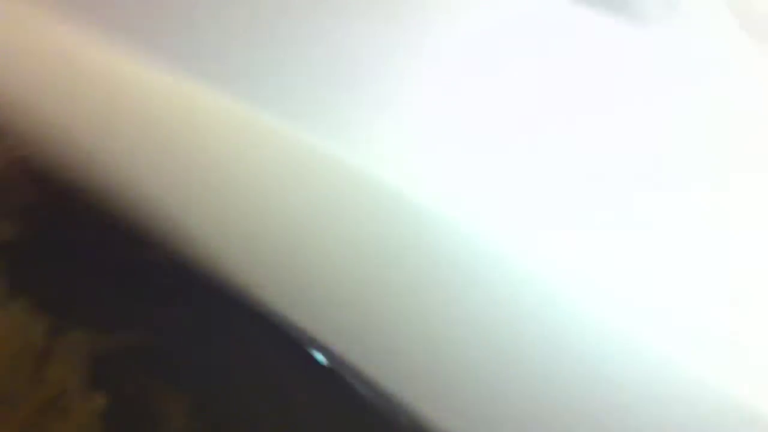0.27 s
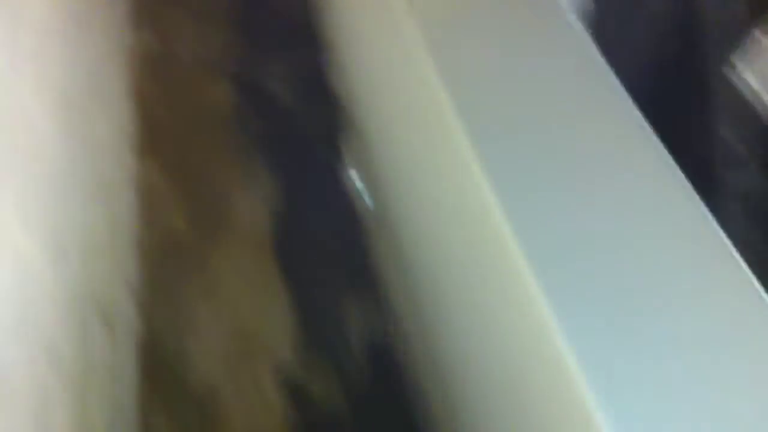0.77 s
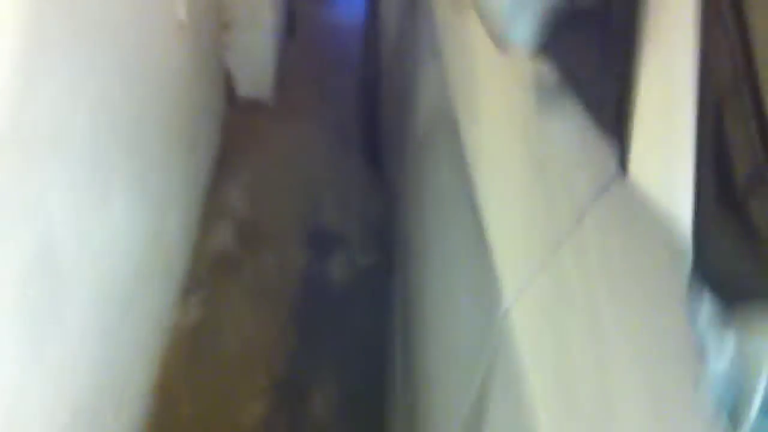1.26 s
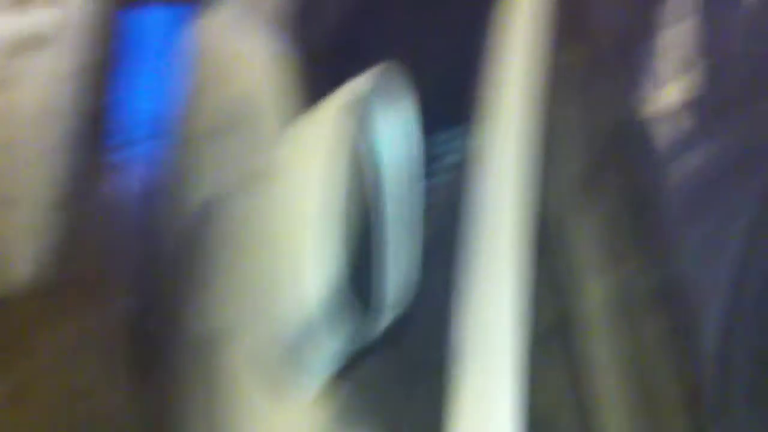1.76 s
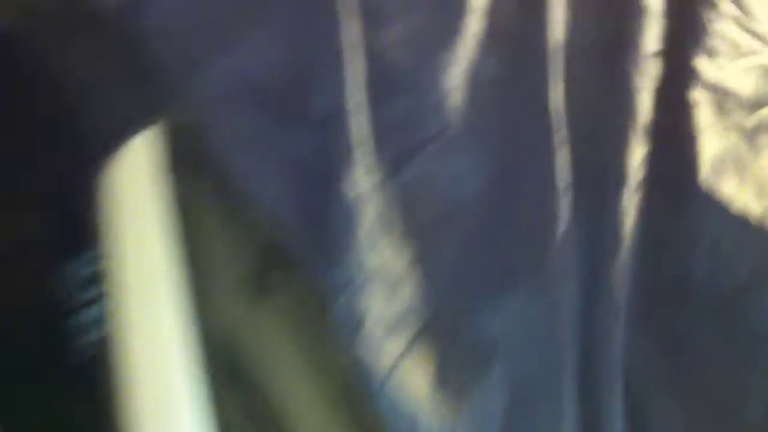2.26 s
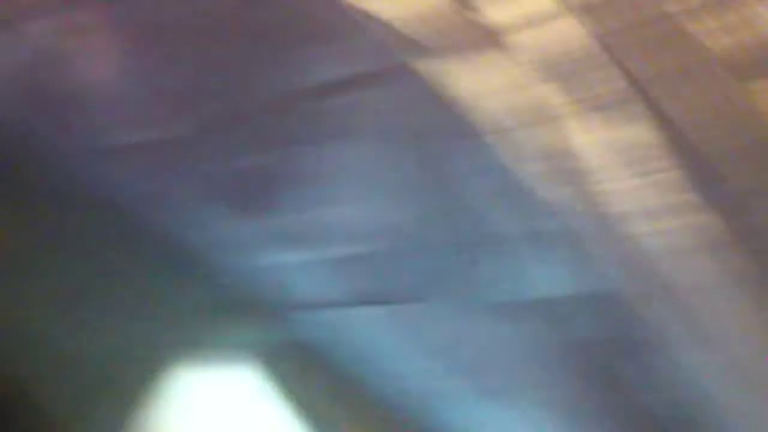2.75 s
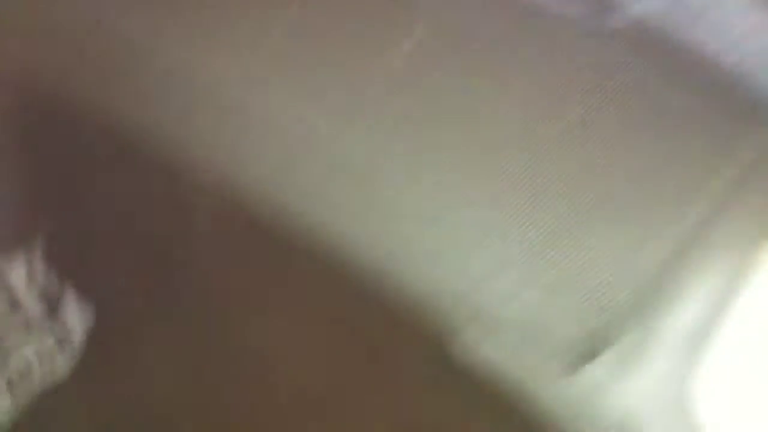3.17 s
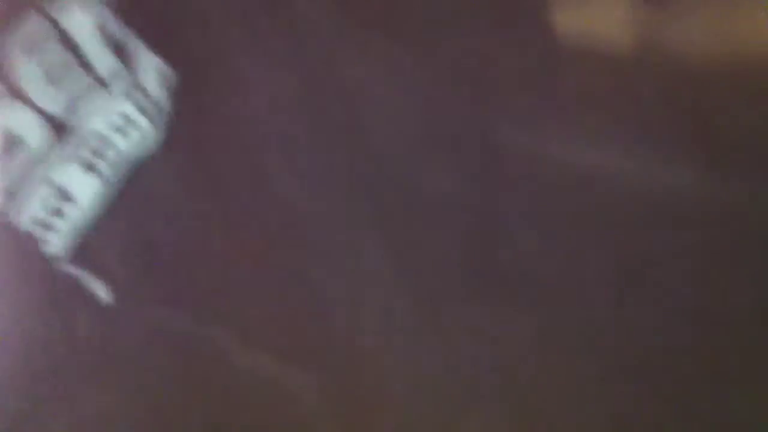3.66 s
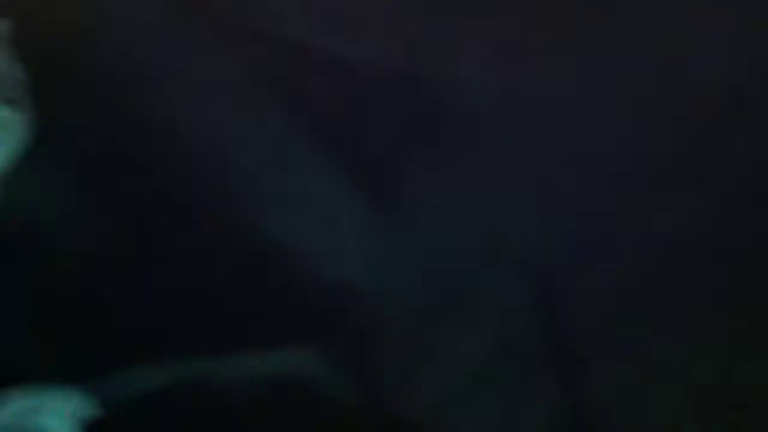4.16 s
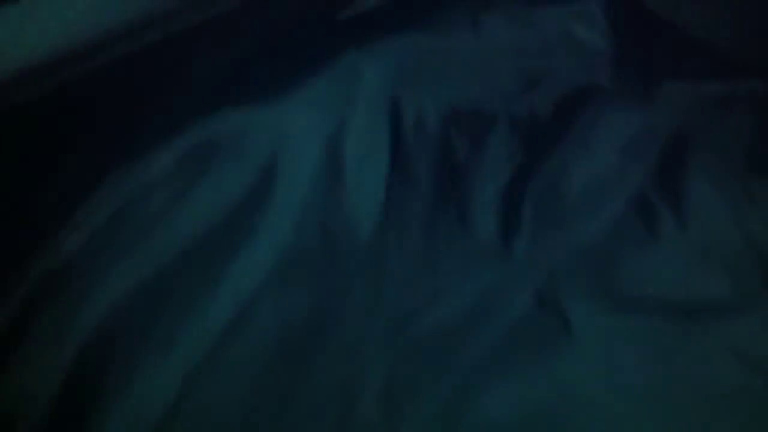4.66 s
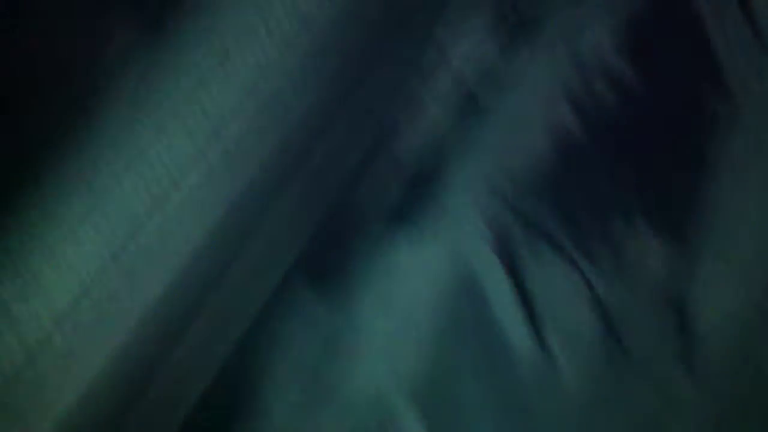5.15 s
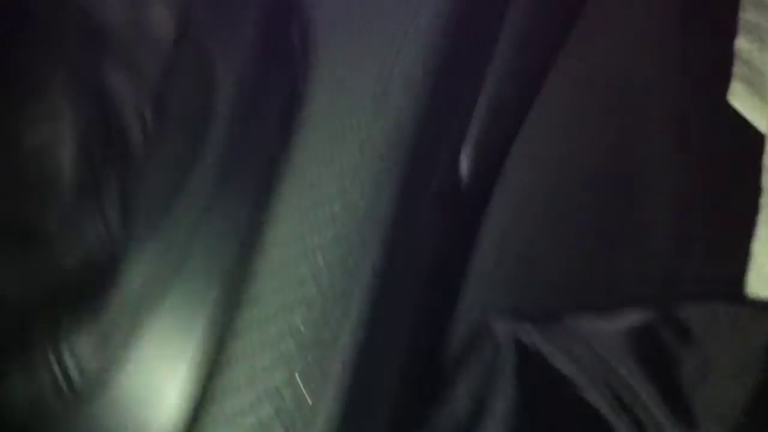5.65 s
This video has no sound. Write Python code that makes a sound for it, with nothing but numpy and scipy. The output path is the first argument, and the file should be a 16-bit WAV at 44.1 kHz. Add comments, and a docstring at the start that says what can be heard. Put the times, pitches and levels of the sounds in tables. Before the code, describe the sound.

A supercharged car engine idles with a low drone, hiss and ticking, swells briefly, then turns quieter and muffled inside the cabin.

```python
"""Hissing intake air and ringing tappets sound over the drone of a supercharged straight-six idling in a garage.
Periodic firing gives the exhaust a harmonic spectrum, whose strongest partials swell and fade as
the listener moves through the room's standing waves. Valve impacts excite resonances of the block
and its cover, and the blower's rotors hum. The listener passes from the engine bay into the cabin,
where the car's body muffles the engine; a sleeve brushes the seat at the end."""
import sys
import numpy as np
from scipy import signal
from scipy.fft import rfft, irfft, next_fast_len
from scipy.io import wavfile
from scipy.ndimage import map_coordinates

SR = 44100
rng = np.random.default_rng(int(sys.argv[2]) if len(sys.argv) > 2 else 0)


def wav_out(sig):
    """Save sig, one row per channel (or a flat mono array), as 16-bit PCM at SR to the path in sys.argv[1]."""
    wavfile.write(sys.argv[1], SR, np.round(np.clip(np.atleast_2d(sig).T, -1, 1) * 32767).astype(np.int16))


N = 260171


def amp(db):
    """Amplitude ratio of a level in decibels."""
    return 10 ** (np.asarray(db) / 20)


def unit(x):
    """Normalisation to rms 1."""
    return x / np.sqrt(np.mean(x ** 2) + 1e-20)


def curves(rows):
    """Linear interpolation: one value per sample for each column after the time."""
    time_s, *columns = np.transpose(rows)
    return [np.interp(np.arange(N) / SR, time_s, column) for column in columns]


def wobble(rate_hz):
    """Random modulation: a smooth curve through rate_hz Gaussian knots a second."""
    knots = rng.standard_normal(int(N * rate_hz / SR) + 4)
    return map_coordinates(knots, [np.arange(N) * rate_hz / SR])


def filtered(x, response):
    """Linear filtering: the spectrum of x times a complex frequency response."""
    size = next_fast_len(N + SR // 2)
    return irfft(rfft(x, size) * response(np.fft.rfftfreq(size, 1 / SR)), size)[..., :N]


def coloured(x, spectrum):
    """Spectral shaping by (frequency_hz, relative_db) points on a log axis, at rms 1."""
    points_hz, db = np.transpose(spectrum)
    return unit(filtered(x, lambda hz: amp(np.interp(np.log(hz + 1), np.log(points_hz), db))))


def ring(x, modes):
    """Modal superposition: x drives damped resonators in parallel, at rms 1."""
    def response(hz):
        return sum(amp(db) * 1j * hz * width / (pitch ** 2 - hz ** 2 + 1j * hz * width)
                   for pitch, width, db in modes)
    return unit(filtered(x, response))


def noise():
    """White Gaussian noise."""
    return rng.standard_normal(N)


def partial(cycle, order):
    """A harmonic of rms 1 that swings order times per engine cycle."""
    return np.sqrt(2) * np.cos(2 * np.pi * order * cycle)


def tones(cycle, orders, flutter_db):
    """Additive synthesis: harmonics of the engine cycle, each unsteady in strength."""
    return sum(amp(db + flutter_db * wobble(7)) * partial(cycle + rng.random(), order)
               for order, db in orders)


def knocks(cycle, count, scatter_db, jitter_s, spread_db=1.6):
    """Quasi-periodic impulses: count parts strike once a cycle, each at its own strength and moment."""
    beats = np.arange(np.ceil(cycle[-1] * count))
    part = beats.astype(int) % count
    offset = rng.uniform(-.3, .3, count)[part]
    when = np.interp((beats + offset) / count, cycle, np.arange(N))
    when += jitter_s * SR * rng.standard_normal(len(beats))
    part_db = spread_db * rng.standard_normal(count)[part]
    strength = amp(part_db + scatter_db * rng.standard_normal(len(beats)))
    inside = (when > 0) & (when < N - SR // 200)
    return np.bincount(when[inside].astype(int), strength[inside], N)


def garage(x, t60_s, path_sets=4):
    """Reverberation from bonnet and walls: the moving listener drifts between sets of reflections."""
    t = np.arange(SR // 2) / SR
    tails = rng.standard_normal((path_sets, len(t))) * amp(-60 * t / t60_s)
    paths = signal.fftconvolve(x[None], tails, axes=1)[:, :N]
    weights = np.array([wobble(.96) for _ in paths])
    return unit(np.sum(weights * paths, axis=0) / np.linalg.norm(weights, axis=0))


# The walk past each part: name -> gain_db, nearest_s, half_power_s, shielded_s, transition_s, loss_db
WALK = { "block": (-36, .95, 1.5, 4.42, .26, 9), "cover": (-35.8, .9, .42, 4.75, .7, 5),
        "injectors": (-40.3, 0, 1.6, 4.62, .9, 10.5), "fan": (-33.2, .9, 2.1, 4.38, .32, 10.3),
        "intake": (-30.5, 0, 1.6, 4.6, .85, 11.3), "tailpipe": (-47.3, 3.3, 2.0, 4.4, .45, 8.5), }
def passing(part):
    """Spherical spreading and transmission loss: gain falls with distance, then on entering the car."""
    gain_db, nearest_s, half_power_s, shielded_s, transition_s, loss_db = WALK[part]
    t = np.arange(N) / SR
    inside = np.clip((t - shielded_s) / transition_s + .5, 0, 1)
    distance = np.hypot(1, (t - nearest_s) / half_power_s)
    return amp(gain_db - loss_db * inside) / distance


# Spectrum of the background: frequency_hz, relative_db
AMBIENT_SPECTRUM = [(25, -6), (55, 1), (90, -9), (150, 24), (220, 13), (300, 11.5), (390, 3.5), (650, 6),
                    (1100, 0.5), (1500, -15), (2800, -4), (3700, -3), (6500, -17), (14000, -33)]
def ambience():
    """Stationary noise: a dull wash that fills garage and cabin alike."""
    return amp(-45) * coloured(noise(), AMBIENT_SPECTRUM)


# One stroke of cloth: peak_s, level_db, rise_s, fade_db_per_s
SLEEVE_STROKE = (5.755, -48.5, .02, 70)
def sleeve():
    """Friction noise: a sleeve brushes the seat cover, rising quickly and decaying exponentially."""
    peak_s, level_db, rise_s, fade_db_per_s = SLEEVE_STROKE
    t = np.arange(N) / SR - peak_s
    stroke = np.clip(1 + t / rise_s, 0, 1) * amp(level_db - fade_db_per_s * np.maximum(t, 0))
    return stroke * coloured(noise(), [(1000, -15), (5000, 0), (11000, 0), (15500, -5)])


# Spectrum of the churned air: frequency_hz, relative_db
FAN_SPECTRUM = [(40, -32), (75, -7), (130, -4), (190, 2), (250, 1.5), (350, -3), (500, 1), (750, -3),
                (1200, -2.5), (1500, -3.5), (2100, -2.5), (2450, -14), (3300, -39), (6000, -47)]
def fan():
    """Turbulence: fan and belts churn the air into broadband noise."""
    return passing("fan") * coloured(noise(), FAN_SPECTRUM)


# Spectrum shared by throttle and timing chain: frequency_hz, relative_db
HISS_SPECTRUM = [(500, -14), (1500, -18), (2700, 2), (3250, -4), (3900, 0.5), (5200, -1), (6500, -2.5),
                 (7300, -3), (8400, 0), (9600, -1), (10800, 0), (12200, -5), (13700, -4), (15700, -15)]
def intake_and_chain(cycle):
    """Modulated flow noise: the throttle hisses with each intake stroke; dense chain impacts sizzle."""
    suction_db = .2 * np.cos(2 * np.pi * 6 * cycle) + .58 * wobble(29.9)
    hiss = amp(suction_db) * coloured(noise(), HISS_SPECTRUM)
    links = knocks(cycle, count=72, scatter_db=2.2, jitter_s=.0001)
    chain = coloured(garage(links, t60_s=.12), HISS_SPECTRUM)
    return passing("intake") * (amp(-1.5) * hiss + amp(-4) * chain)


# Modes of the block and its brackets: pitch_hz, bandwidth_hz, relative_db
BLOCK_MODES = [(460, 31, -4.5), (530, 71, -8), (1139, 95, 0), (1406, 60, -7), (1670, 67, -1.5),
               (1870, 30, 2.5), (1934, 106, -5.5), (2134, 80, -7.5), (2186, 21, -6.5)]
# Modes of the valve cover: pitch_hz, bandwidth_hz, relative_db
COVER_MODES = [(1081, 50, -3), (1267, 49, 5.5), (1690, 130, -6.5), (3830, 360, -15), (4690, 220, -14)]
def valves(cycle):
    """Impact excitation: 24 valve knocks a cycle set the block and its cover ringing."""
    impacts = garage(knocks(cycle, count=24, scatter_db=1.6, jitter_s=.00012), t60_s=.25)
    block = passing("block") * ring(impacts, BLOCK_MODES)
    cover = passing("cover") * ring(impacts, COVER_MODES)
    return block + cover


# Modes of the tappets: pitch_hz, bandwidth_hz, relative_db
TAPPET_MODES = [(2720, 70, -17), (2838, 32, 0)]
# The tappets' ring, dimming in steps along the walk: time_s, level_db
TAPPET_LEVEL = [(0.0, -31), (0.59, -44.5), (2.15, -43.5), (2.22, -48), (4.27, -48), (5.13, -59.5),
                (5.9, -59)]
# Modes of the injectors: pitch_hz, bandwidth_hz, relative_db
INJECTOR_MODES = [(3545, 95, -6.5), (7520, 100, -1), (7810, 100, 4), (8130, 110, -2.5), (10100, 130, -13),
                  (10400, 250, -7)]
def tappets_and_injectors(cycle):
    """Resonance of small parts: six ticks a cycle ring at high natural frequencies."""
    ticks = garage(knocks(cycle, count=6, scatter_db=1.8, jitter_s=.00015), t60_s=.4)
    tappets = amp(curves(TAPPET_LEVEL)[0]) * ring(ticks, TAPPET_MODES)
    injectors = passing("injectors") * ring(ticks, INJECTOR_MODES)
    return tappets + injectors


# Rotor pulsation and its sidebands, a pulse on every other firing: order_per_cycle, relative_db
BLOWER_ORDERS = [(57, -8.5), (60, -1), (63, -11.5)]
# Contour of the hum: time_s, relative_db
BLOWER_CONTOUR = [(0.1, -45), (0.24, -40), (2.13, -40), (2.28, -33.5), (2.54, -39.5), (4.54, -42.5),
                  (4.88, -53), (5.8, -54)]
def blower(cycle):
    """Periodic displacement: the rotors push out regular puffs of air, a slightly rough hum."""
    rotor = cycle + .0004 * wobble(20)  # the drive belt stretches and gives
    return amp(curves(BLOWER_CONTOUR)[0] - 1.06) * tones(rotor, BLOWER_ORDERS, flutter_db=2)


# Firing harmonics in the standing waves along the walk: time_s, fourth_db, third_db
STANDING_WAVES = [(0.08, -24.5, -30), (0.54, -23, -30), (0.86, -25, -31.5), (1.24, -33.5, -35),
                  (1.51, -32, -34.5), (2.05, -23.5, -27), (2.71, -18, -23), (3.49, -18.5, -26),
                  (4.22, -25.5, -33), (4.38, -27.5, -37.5), (5.18, -41.5, -37.5), (5.8, -35.5, -36.5)]
# Uneven firing, from manifold imbalance and from lope: time_s, manifold_db, lope_relative_db
UNEVEN_FIRING = [(0.1, -40, -38), (0.8, -41, -41), (1.53, -38, -35), (2.45, -49.5, -41), (2.92, -36, -37),
                 (2.96, -35, -29), (4.15, -35, -34.5), (4.74, -40, -42), (5.8, -44, -43)]
# What one weak cylinder takes from the drone: order_per_cycle, relative_db
LOPE_ORDERS = [(16, -13), (21, -5.5), (22, -3.5), (23, -9)]
# Faint tailpipe overtones: order_per_cycle, relative_db
TAILPIPE_ORDERS = [(6, -30), (27, 3), (30, 0), (33, -11.5), (35, -16), (36, -3), (42, -3.5), (48, -5.5),
                   (66, -1), (69, -9), (72, -4), (76, -10)]
def exhaust(cycle):
    """Harmonic series of six firings a cycle; unequal firings add a throb and lope between harmonics."""
    manifold_lag_cycles, weak_firing_cycles = .008, 7 / 12
    fourth_db, third_db = curves(STANDING_WAVES)
    manifold_db, lope_db = curves(UNEVEN_FIRING)
    drone = amp(fourth_db) * partial(cycle, order=24) + amp(third_db) * partial(cycle, order=18)
    boom = tones(cycle, [(12, -49)], flutter_db=3)  # 2nd harmonic: too long a wave to vary along the walk
    # One manifold half is stronger and one arrives late: a throb on every other firing.
    throb = amp(manifold_db) * partial(cycle - manifold_lag_cycles, order=15)
    throb += amp(lope_db - 3.5) * partial(cycle, order=21)
    weak_cylinder = sum(amp(db) * partial(cycle - weak_firing_cycles, order) for order, db in LOPE_ORDERS)
    lope = amp(lope_db + 1) * weak_cylinder
    overtones = passing("tailpipe") * tones(cycle, TAILPIPE_ORDERS, flutter_db=1)
    burn = amp(.32 * wobble(30))  # no two firings burn alike
    return burn * (drone + boom + throb - lope + overtones)


# Idle speed of the crankshaft: time_s, speed_rpm
CRANK_SPEED = [(0, 872.3), (.45, 868.1), (1.3, 877.9), (2.1, 870.2), (3.1, 872.9), (5.9, 870.0)]
def scene():
    """Superposition: all sources add, with the engine's tones and impacts locked to one crank phase."""
    first_beat_s = .0295
    rpm = curves(CRANK_SPEED)[0]
    turns = (np.cumsum(rpm) / SR - first_beat_s * rpm[0]) / 60
    cycle = turns / 2  # a four-stroke cycle takes two crank turns
    engine = exhaust(cycle) + blower(cycle) + valves(cycle) + tappets_and_injectors(cycle)
    mono = engine + intake_and_chain(cycle) + fan() + ambience() + sleeve()
    return np.array([mono, mono])


def record(dry):
    """Band limiting: an ideal low-pass filter removes the highest treble."""
    cutoff_hz = 15750
    return filtered(dry, lambda hz: hz < cutoff_hz)


dry = scene()
out = record(dry)
wav_out(out)
```